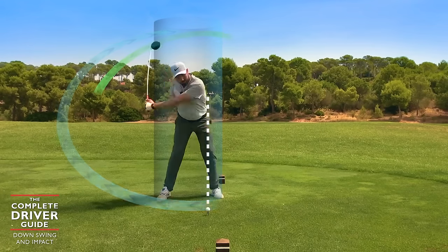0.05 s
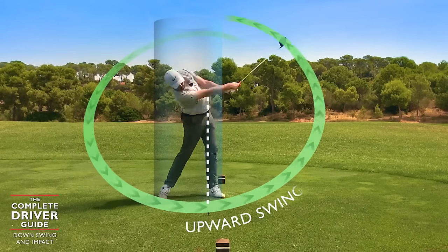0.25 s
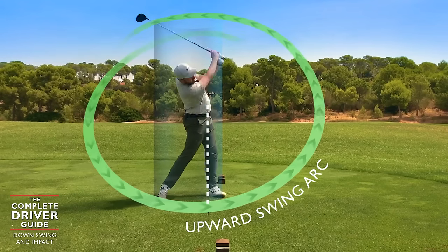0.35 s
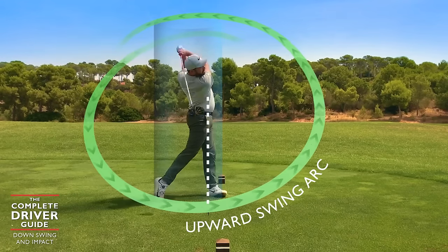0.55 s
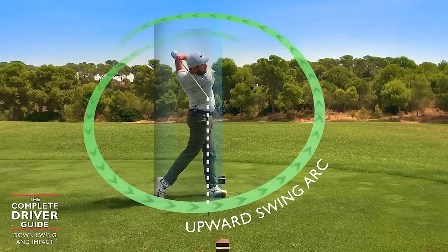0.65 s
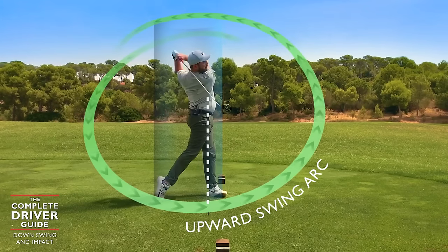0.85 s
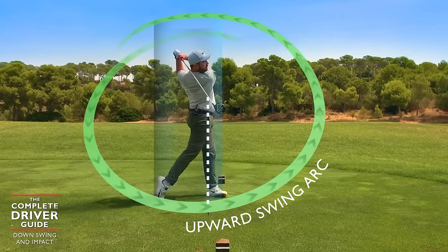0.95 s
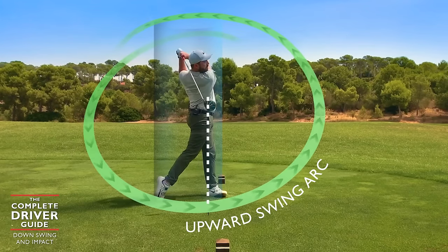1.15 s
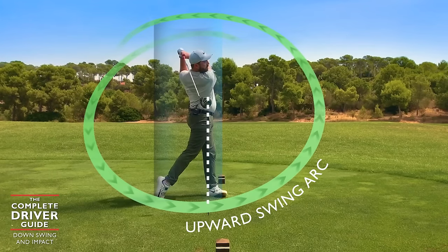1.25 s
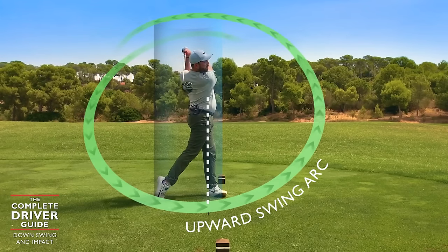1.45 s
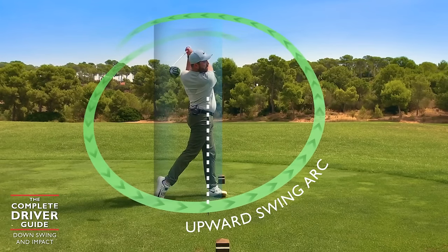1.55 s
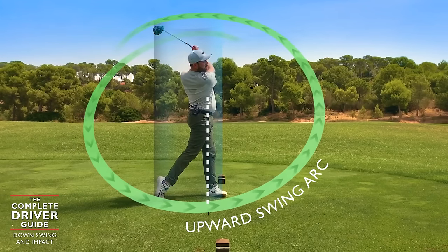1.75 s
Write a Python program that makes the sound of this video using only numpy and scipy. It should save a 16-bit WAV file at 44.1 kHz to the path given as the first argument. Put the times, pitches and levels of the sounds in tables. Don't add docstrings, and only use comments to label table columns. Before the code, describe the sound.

A driver strikes a golf ball with one loud, bright crack after cloth ticks and a fast swoosh; a brief hollow metal ring, faint tree echoes and a small tee snap follow, shirt-mounted microphone on an open course.

```python
import sys
import numpy as np
from scipy import signal
from scipy.fft import rfft, irfft
from scipy.io import wavfile
from scipy.ndimage import uniform_filter1d

SR = 44100
rng = np.random.default_rng(int(sys.argv[2]) if len(sys.argv) > 2 else 0)


def store_pcm(level_fs):
    pcm = np.round(np.clip(level_fs, -1, 1) * 32767).astype(np.int16)
    wavfile.write(sys.argv[1], SR, np.atleast_2d(pcm).T)


def volts_from_decibels(level):
    exponent = np.asarray(level, float) / 20
    return 10 ** exponent


N = 79380
T = np.arange(N) / SR
STRIKE_S = .2008

# frequency in Hz, level in dB per Hz.
CLOTH_COLOUR = [(180, -33), (300, -1), (780, -3.5), (1250, -11.5), (3970, -4), (10500, -8.5), (15400, -15),
                (16500, -26.5)]


def evened(x):
    return x / np.sqrt(np.mean(x ** 2) + 1e-20)


def noise(colour, source=None):
    hz = np.fft.rfftfreq(N, 1 / SR) + 1
    points_hz, points_db = np.transpose(colour)
    source = rng.standard_normal(N) if source is None else source
    gain_db = np.interp(np.log(hz), np.log(points_hz), points_db, -80, -80)
    return evened(irfft(rfft(source) * volts_from_decibels(gain_db), N))


def lumps(length_s):
    n = max(int(length_s * SR), 1)
    once = uniform_filter1d(rng.standard_normal(N), n)
    return evened(uniform_filter1d(once, n))


def curve(rows, column=1):
    columns = np.transpose(rows)
    return np.interp(T, columns[0], columns[column])


def during(rows):
    return (T > rows[0][0]) * (T < rows[-1][0])


def bump(centre_s, length_s):
    return np.exp(-((T - centre_s) / length_s) ** 2)


def swell(start_s, t60_s, rise_s):
    t = np.maximum(T - start_s, 0)
    envelope = (1 - np.exp(-(t / rise_s) ** 2)) * volts_from_decibels(-60 * t / t60_s)
    return envelope / envelope.max()


def ring(start_s, modes):
    out = np.zeros(N)
    for hz, db, t60_s, rise_s in modes:
        tone = np.sin(2 * np.pi * (hz * (T - start_s) + rng.random()))
        out = out + volts_from_decibels(db) * swell(start_s, t60_s, rise_s) * tone
    return out


def wind():
    # time in seconds, level in dB over the mean wind.
    gusts = [(0, 7), (.04, 6), (.11, 6.5), (.35, 7.5), (.46, 7), (.65, -1), (.746, 3), (.792, -3),
             (.896, 2.5), (.986, -2.5), (1.072, 3), (1.148, -7), (1.192, 1.5), (1.318, -2.5), (1.372, -6.5),
             (1.644, 2), (1.698, -4.5), (1.734, 0)]
    # frequency in Hz, level in dB per Hz.
    wind_colour = [(12, -56), (20, -28), (24, -13), (35, -3), (70, -1), (91, 3.5), (124, -3.5),
                   (300, -24.5), (390, -46), (660, -120)]
    return volts_from_decibels(-62 + curve(gusts) + 1 * lumps(.03)) * noise(wind_colour)


def air():
    # frequency in Hz, level in dB per Hz.
    air_colour = [(120, -40.5), (200, -9.5), (245, -6.5), (594, -9.5), (689, -9), (1390, -11.5),
                  (4370, -20), (15000, -21.5), (16500, -34.5)]
    return volts_from_decibels(-70.5) * noise(air_colour)


def insects():
    hz, spread_hz = 4450, 600
    band = [(hz - spread_hz, -20), (hz, 0), (hz + spread_hz, -20)]
    return volts_from_decibels(-83 + 2.0 * lumps(.012)) * noise(band)


def bird():
    start_s, length_s, from_hz, to_hz = .785, .05, 5500, 5100
    u = np.clip((T - start_s) / length_s, 0, 1)
    phase = 2 * np.pi * np.cumsum(from_hz + (to_hz - from_hz) * u) / SR
    return volts_from_decibels(-75) * np.sin(np.pi * u) * np.sin(phase)


def arm_brush():
    # frequency in Hz, level in dB per Hz.
    brush_colour = [(1500, -15), (3000, 0), (4500, 0), (7500, -14)]
    return volts_from_decibels(-55 + 2.5 * lumps(.001)) * bump(.026, .012) * noise(brush_colour)


def thumps():
    # time in seconds, level in dB.
    rumble = [(0, -62), (.1, -59), (.2, -42), (.3, -53.5), (.4, -53), (.5, -66.5), (.6, -69.5), (.75, -69),
              (.85, -78.5), (1.8, -80.5)]
    # frequency in Hz, level in dB per Hz.
    mount_colour = [(70, -14.5), (120, 2.5), (180, -1.5), (300, -9), (450, -18)]
    # start in seconds, level in dB, pitch in Hz, t60 in seconds, build-up in seconds.
    body_thumps = [
        (.057, -28, 71.3, 0.048, .026),
        (0.082, -31, 120, 0.041, 0.0014),
        (0.265, -33, 60, 0.078, 0.021),
        (0.293, -39, 92.5, 0.023, 0.0038),
        (.33, -42.5, 110, 0.076, 0.0068),
        (0.416, -34, 85, .06, 0.0013),
        (1.402, -50, 85, 0.063, 0.0034),
    ]
    out = volts_from_decibels(curve(rumble)) * noise(mount_colour)
    for start_s, db, hz, t60_s, rise_s in body_thumps:
        out = out + volts_from_decibels(db) * swell(start_s, t60_s, rise_s) * np.sin(2 * np.pi * hz * (T - start_s))
    return out


def rustle():
    # time in seconds, level in dB.
    rubbing = [(0, -72), (.025, -63), (.045, -61.5), (.1, -68), (.115, -60), (.14, -60), (.25, -66.5),
               (.3, -56), (.36, -61), (.4, -58.5), (.44, -58), (.48, -61.5), (.56, -68.5), (.65, -87),
               (1.35, -81), (1.52, -73.5), (1.6, -78), (1.8, -89)]
    # time in seconds, level in dB.
    movement = [(0, -65), (.1, -56.5), (.3, -73.5), (.38, -59), (.42, -54), (.47, -64.5), (.55, -62),
                (.62, -65.5), (.68, -61), (.74, -63.5), (.78, -61.5), (.84, -80.5), (1.3, -84),
                (1.42, -71.5), (1.51, -64.5), (1.56, -65), (1.62, -66.5), (1.8, -74)]
    # frequency in Hz, level in dB per Hz.
    dull_colour = [(150, -2), (400, -6), (900, -9), (2000, -14), (3500, -21.5), (7000, -22), (14700, -28.5),
                   (16500, -38.5)]
    bright = volts_from_decibels(curve(rubbing) + 1.5 * lumps(.01)) * noise(CLOTH_COLOUR)
    dull = volts_from_decibels(curve(movement) - 2.0 + 0.5 * lumps(.004)) * noise(dull_colour)
    return bright + dull


def creases():
    # start in seconds, length in seconds, level in dB.
    drags = [
        (0.0546, 0.0072, -40),
        (.062, 0.0093, -45.5),
        (.07, .01, -46.5),
        (.078, .007, -53),
        (.245, 0.056, -51),
    ]
    # frequency in Hz, level in dB per Hz.
    drag_colour = [(150, -29.5), (250, 7.5), (947, -5), (1840, -8), (2200, -10.5), (12200, -17),
                   (15700, -20.5), (16500, -38)]
    # frequency in Hz, level in dB per Hz.
    sleeve_colour = [(600, -23), (1200, 1), (2500, 4), (3600, -9)]
    # frequency in Hz, level in dB, t60 in seconds, build-up in seconds.
    seam_modes = [(5300, -68, .015, .002), (5800, -70, .012, .002)]
    grains = rng.standard_normal(N) * volts_from_decibels(2.732 * lumps(0.0005026))
    drag = np.zeros(N)
    for start_s, length_s, db in drags:
        edge_s = np.minimum(T - start_s, start_s + length_s - T)
        drag = drag + volts_from_decibels(db) * np.clip(edge_s / 0.0014, 0, 1)
    sleeve = volts_from_decibels(-72.5) * bump(1.518, 0.11) * noise(sleeve_colour, grains)
    return drag * noise(drag_colour, grains) + sleeve + ring(1.517, seam_modes)


def cloth_ticks():
    # start in seconds, click peak in dB, low push in dB.
    tick_rows = [(.6572, -54, -62), (0.6633, -56, -53), (.6674, -54, -54), (.6702, -52.5, -45),
                 (.6728, -37, -64), (0.6736, -50, -65), (0.6765, -60, -62), (.6797, -44, -58),
                 (.6832, -51, -47), (0.6905, -55, -52), (.056, -35, -55), (.0593, -26, -45),
                 (.0688, -46, -55), (1.521, -58, -67)]
    click_hz, t60_s, push_s = 9500, .0007, .00015
    out = np.zeros(N)
    for start_s, db, push_db in tick_rows:
        click = np.sin(2 * np.pi * click_hz * (T - start_s)) + 0.46 * rng.standard_normal(N)
        out = out + volts_from_decibels(db) * swell(start_s, t60_s, .00005) * click
        u = np.maximum(T - start_s, 0) / push_s
        out = out + volts_from_decibels(push_db) * np.e * u * np.exp(-u)
    return out


def swoosh():
    # time in seconds, level in dB, whistle pitch in Hz.
    swing = [
        (.1, -68, 400),
        (.14, -64, 600),
        (.162, -45, 830),
        (.18, -36, 930),
        (.198, -38.5, 1033),
        (.215, -38.5, 720),
        (.25, -50.5, 603),
        (.29, -53.5, 484),
        (.305, -71, 400),
    ]
    # frequency in Hz, level in dB per Hz.
    wake_colour = [(100, -12), (250, -4), (500, 1), (800, 2), (1100, -10.5), (1600, -12), (2500, -17.5)]
    # frequency in Hz, level in dB per Hz.
    hiss_colour = [(1200, -8.5), (4000, 0), (7000, 1), (11000, -7.5), (16000, -12)]
    whistle_width_hz = 150
    turn = np.exp(2j * np.pi * np.cumsum(curve(swing, column=2)) / SR)
    r = np.exp(-np.pi * whistle_width_hz / SR)
    slow = signal.lfilter([1 - r], [1, -r], rng.standard_normal(N) / turn)
    slow = signal.lfilter([1 - r], [1, -r], slow)
    whistle = evened((turn * slow).real)
    mix = whistle + volts_from_decibels(1) * noise(wake_colour) + volts_from_decibels(-10) * noise(hiss_colour)
    return volts_from_decibels(curve(swing)) * during(swing) * mix


def tee_snap():
    # frequency in Hz, level in dB, t60 in seconds, build-up in seconds.
    tee_modes = [(1830, -33, .0035, .0008), (2350, -35, .003, .0006), (1100, -42, .006, .001),
                 (4000, -39, .005, .0003), (4900, -39, .003, .0002), (5850, -32, .003, .0002),
                 (7680, -30, .006, .0002), (8790, -38, .016, .0003), (9500, -36, .004, .0002),
                 (11200, -33, .004, .0002), (14500, -40, .002, .0002)]
    snap_s = .415
    burst = volts_from_decibels(-42.5) * swell(snap_s, 0.0096, 0.0012) * noise(CLOTH_COLOUR)
    return ring(snap_s, tee_modes) + burst


def crown_ping():
    # centre in Hz, level in dB, t60 in seconds, build-up in seconds.
    crown_mode = (5382, -10, .075, .007)
    beat_hz, null_s = 62, .2195
    beat = np.sin(np.pi * beat_hz * (T - null_s)) * volts_from_decibels(1.5 * lumps(0.00052))
    return beat * ring(STRIKE_S, [crown_mode])


def shaft_ping():
    # time in seconds, level in dB, pitch in Hz.
    shaft = [
        (.208, -70, 2100),
        (.213, -47, 2105),
        (.25, -49.5, 2118),
        (.3, -57, 2135),
        (.33, -68.5, 2150),
        (.37, -85.5, 2147),
    ]
    phase = 2 * np.pi * np.cumsum(curve(shaft, column=2)) / SR
    return volts_from_decibels(curve(shaft)) * during(shaft) * np.sin(phase)


def head_ring():
    # frequency in Hz, level in dB, t60 in seconds, arrival after the blow in seconds.
    head_modes = [(2850, -9, .03, .0052), (3080, -19, .07, .008), (4495, -6, .045, .0037),
                  (4380, -13, .05, .004), (5005, -21, .06, .004), (5185, -20, .05, .004),
                  (5541, -19, .08, .004), (5962, -15, .05, .0025), (6171, -15, .05, .0027),
                  (6328, -10, .035, .0025), (6736, -14, .04, .005), (7550, -24, .05, .003),
                  (8500, -23, .05, .003), (9460, -7.5, .016, .0045)]
    rise_s, turn_s, turn_length_s, turn_db = 0.0011, .2165, .001, -12
    turned = .5 + .5 * np.tanh((T - turn_s) / turn_length_s)
    out = sum(ring(STRIKE_S + lag_s, [(hz, db, t60_s, rise_s)]) for hz, db, t60_s, lag_s in head_modes)
    return volts_from_decibels(turn_db * turned) * out


def ball_knock():
    # frequency in Hz, level in dB, t60, build-up and arrival in seconds.
    ball_modes = [(2144, -8.5, .005, .0008, .0005), (1280, -16, .011, .0015, .0012),
                  (830, -16.5, .01, .001, .0012), (590, -18, .01, .0012, .002),
                  (360, -20, .015, .002, .0035), (92.59, -28.5, .04, .006, .0015),
                  (690, -28, .025, .003, .0105)]
    return sum(ring(STRIKE_S + row[4], [row[:4]]) for row in ball_modes)


def crack():
    # frequency in Hz, level in dB per Hz.
    crack_colour = [(180, -38), (300, -21), (1770, -25), (2840, -9), (3590, -12), (4460, -3.5), (9490, -9),
                    (14200, -21.5), (16500, -36)]
    # delay in seconds, level in dB, smear in seconds.
    echoes = [
        (.024, -36, 0.0031),
        (0.066, -39.5, .008),
        (.092, -52, 0.0035),
    ]
    contact = volts_from_decibels(-22) * swell(STRIKE_S, .012, .0004)
    answer = volts_from_decibels(-10.5) * swell(STRIKE_S + .0022, 0.033, 0.0018)
    tail = volts_from_decibels(-32) * swell(STRIKE_S, 0.099, 0.01)
    near = (answer + contact + tail) * noise(crack_colour)
    t = T[:6000]
    smear = np.zeros(len(t))
    for delay_s, db, smear_s in echoes:
        smear = smear + volts_from_decibels(db) * np.exp(-((t - delay_s) / smear_s) ** 2) / np.sqrt(smear_s * SR)
    return near + signal.fftconvolve(near, smear * rng.standard_normal(len(t)))[:N]


def scene():
    background = wind() + air() + insects() + bird()
    body = arm_brush() + thumps() + rustle() + creases() + cloth_ticks()
    strike = crown_ping() + shaft_ping() + head_ring() + ball_knock() + crack()
    fade_in = np.minimum(T / 0.0053 + 0.79, 1)
    return ((background + body + swoosh() + tee_snap() + strike) * fade_in)[None]


def low_pass(x):
    return signal.sosfilt(signal.butter(12, 16680, fs=SR, output="sos"), x)


def record(dry):
    ceiling, edge_hz = .82, 16500
    clipped = np.clip(dry, -ceiling, ceiling)
    lowpass = signal.firwin(255, edge_hz, fs=SR)[None]
    return low_pass(signal.oaconvolve(clipped, lowpass, "same"))


dry = scene()
out = record(dry)
store_pcm(out)
```